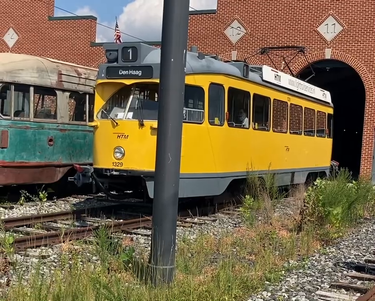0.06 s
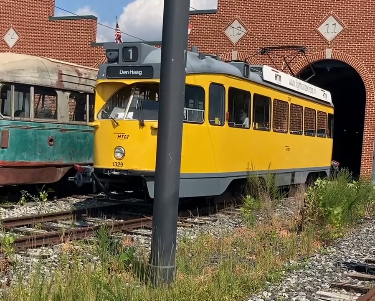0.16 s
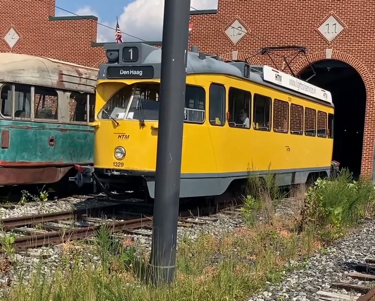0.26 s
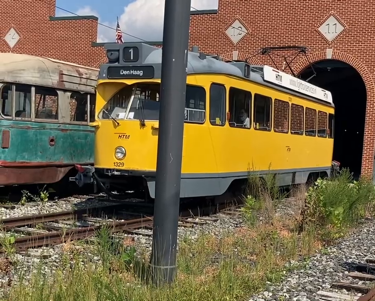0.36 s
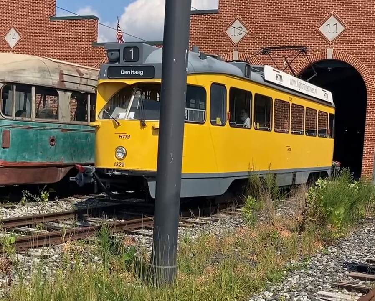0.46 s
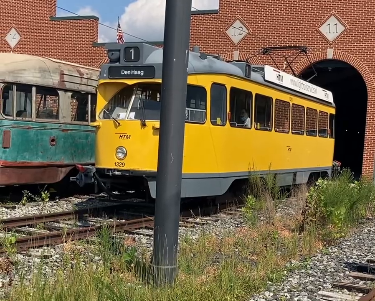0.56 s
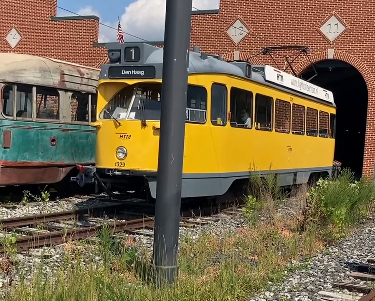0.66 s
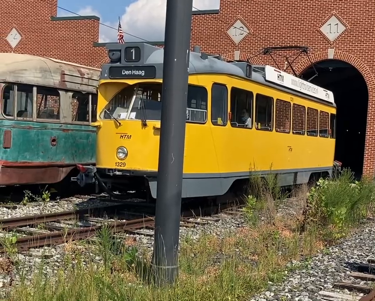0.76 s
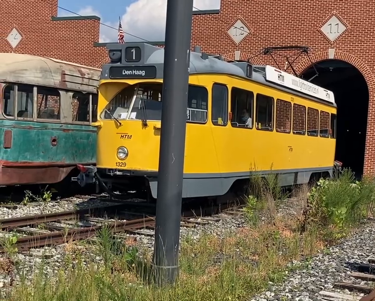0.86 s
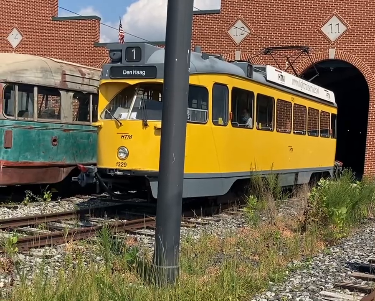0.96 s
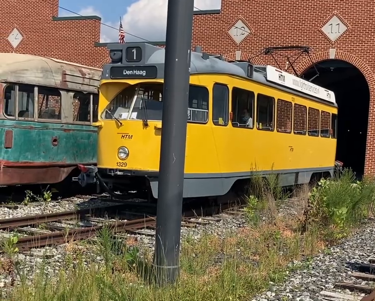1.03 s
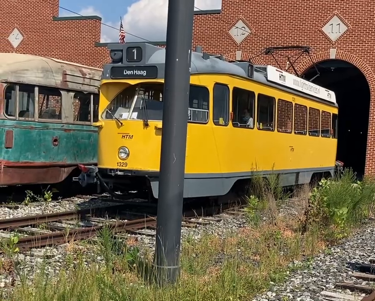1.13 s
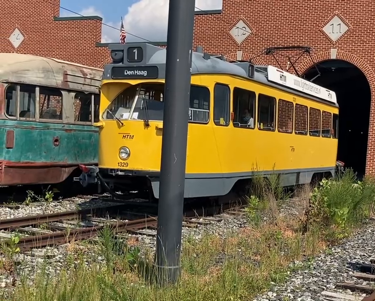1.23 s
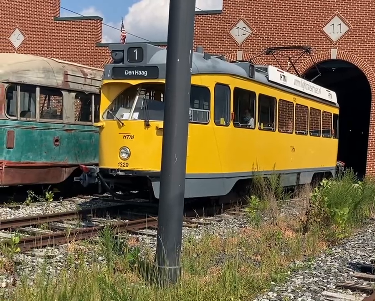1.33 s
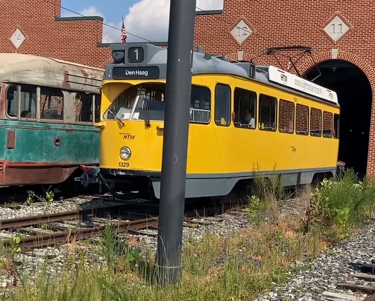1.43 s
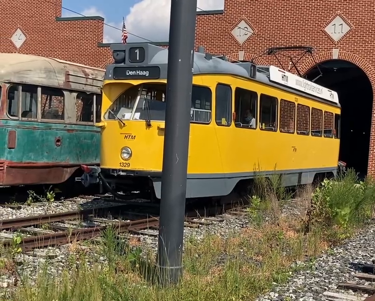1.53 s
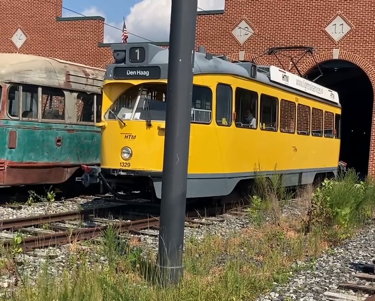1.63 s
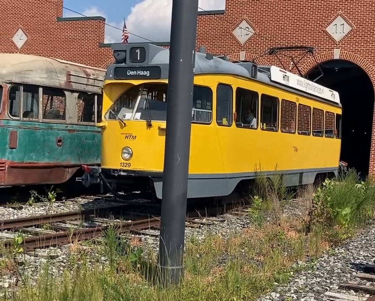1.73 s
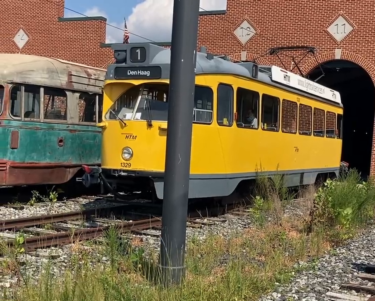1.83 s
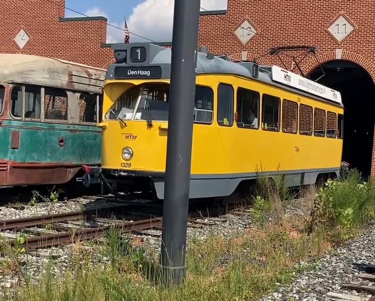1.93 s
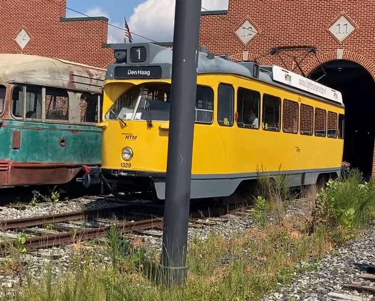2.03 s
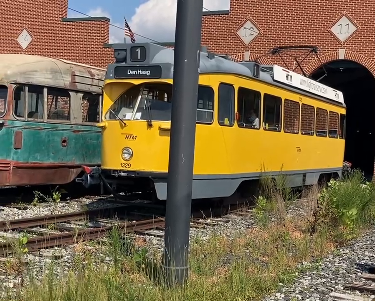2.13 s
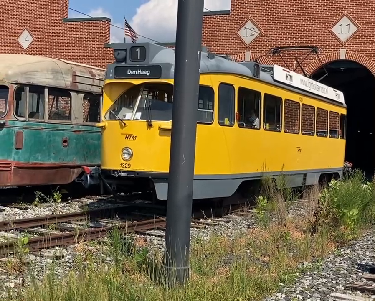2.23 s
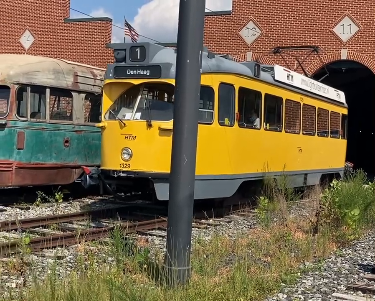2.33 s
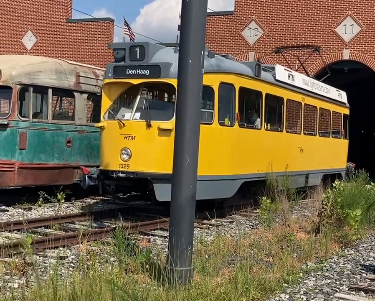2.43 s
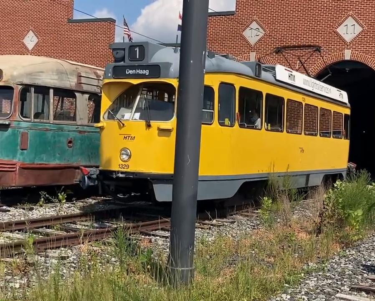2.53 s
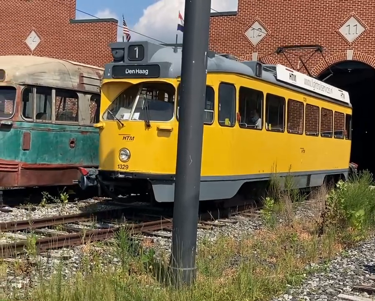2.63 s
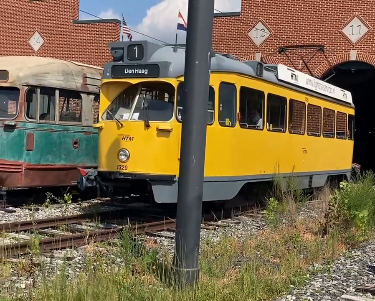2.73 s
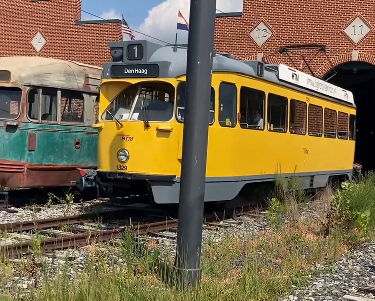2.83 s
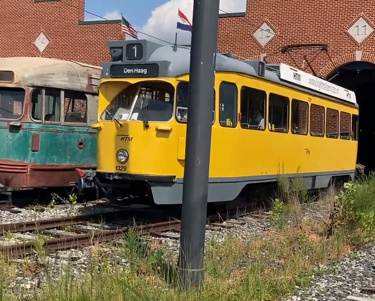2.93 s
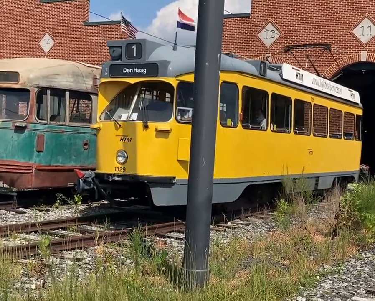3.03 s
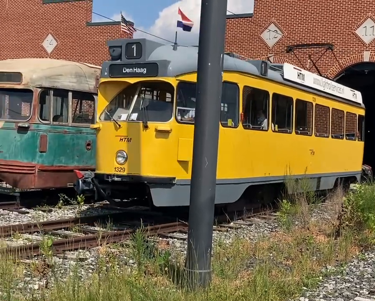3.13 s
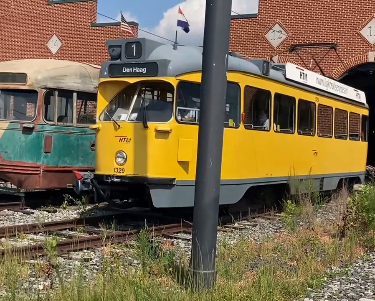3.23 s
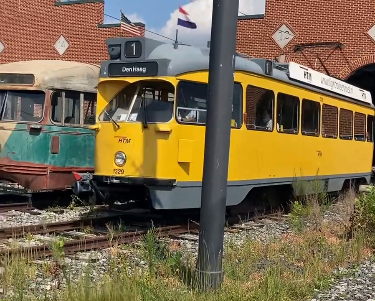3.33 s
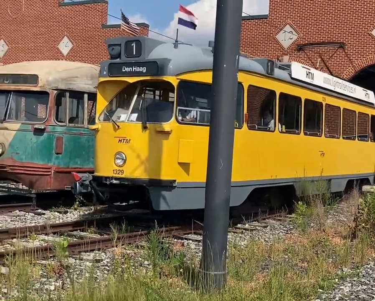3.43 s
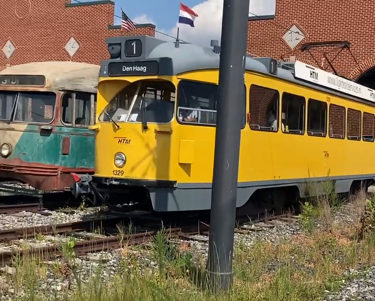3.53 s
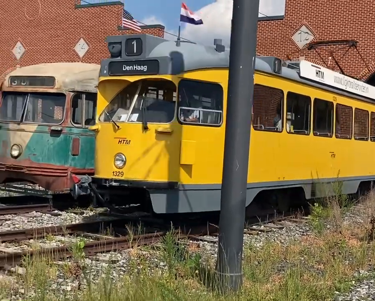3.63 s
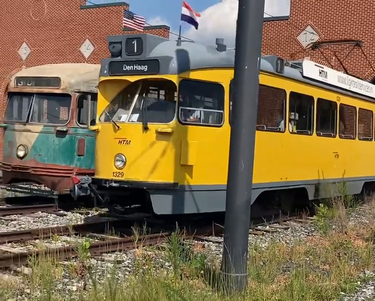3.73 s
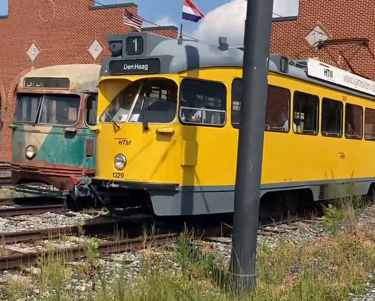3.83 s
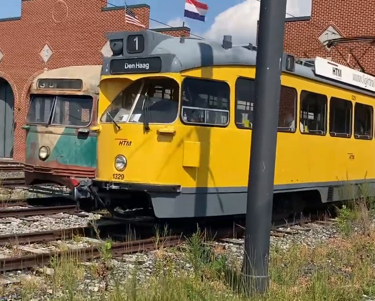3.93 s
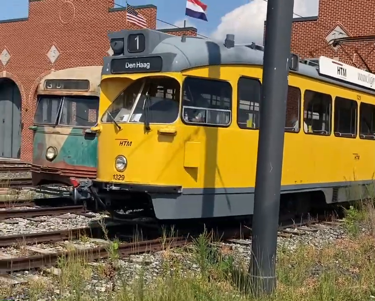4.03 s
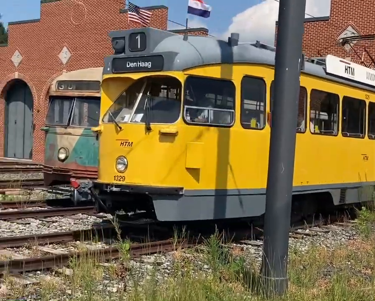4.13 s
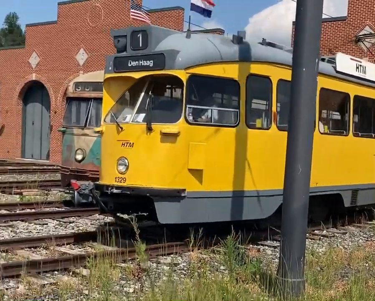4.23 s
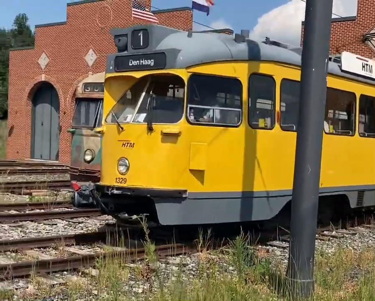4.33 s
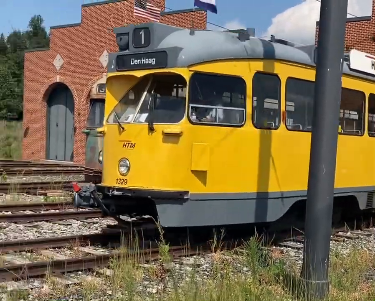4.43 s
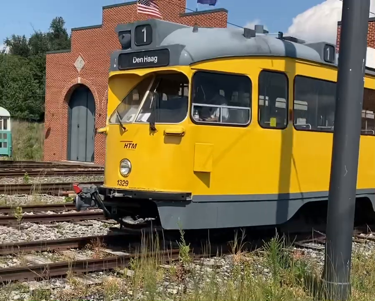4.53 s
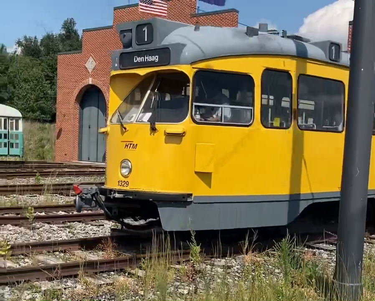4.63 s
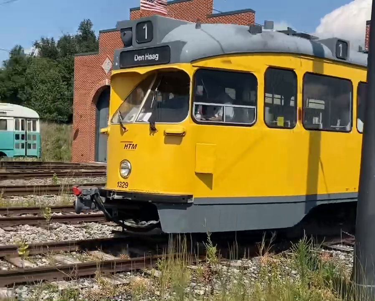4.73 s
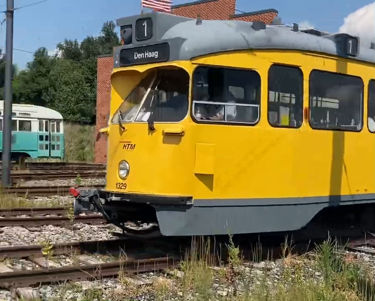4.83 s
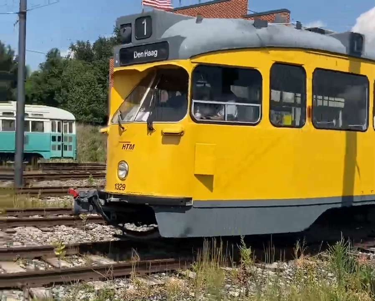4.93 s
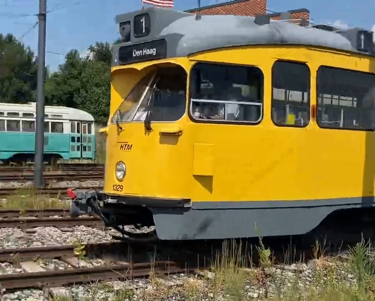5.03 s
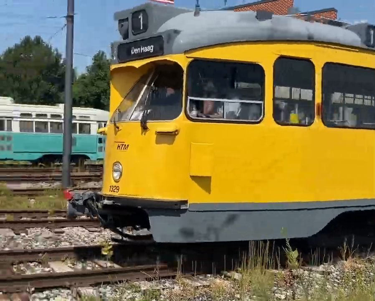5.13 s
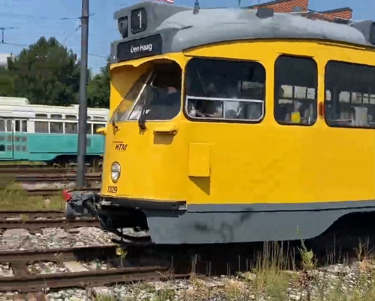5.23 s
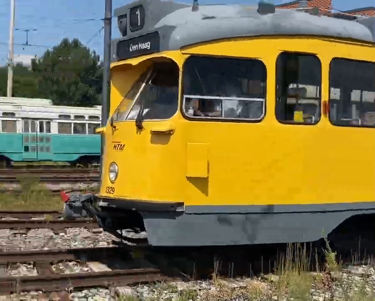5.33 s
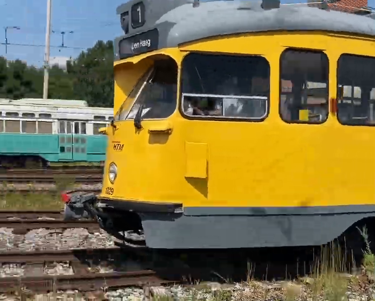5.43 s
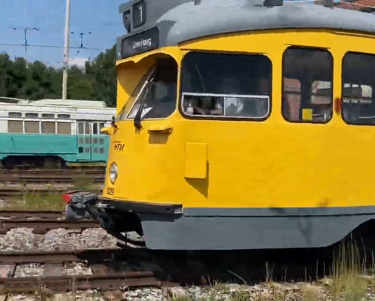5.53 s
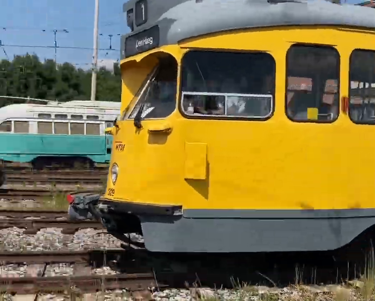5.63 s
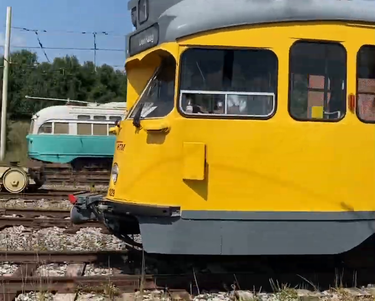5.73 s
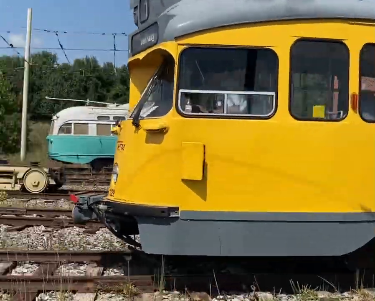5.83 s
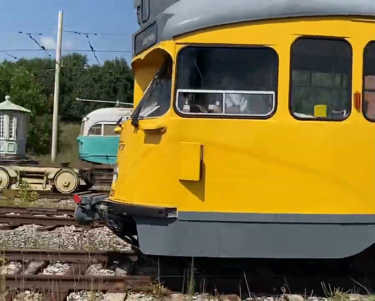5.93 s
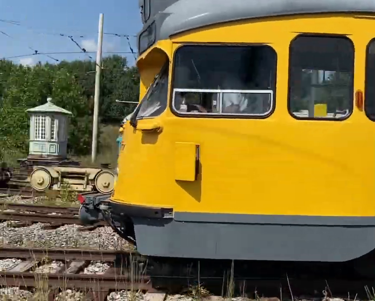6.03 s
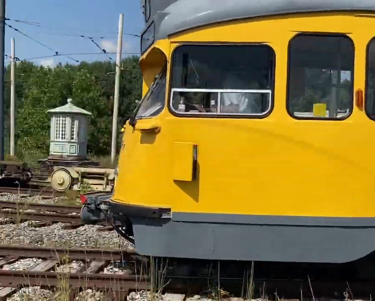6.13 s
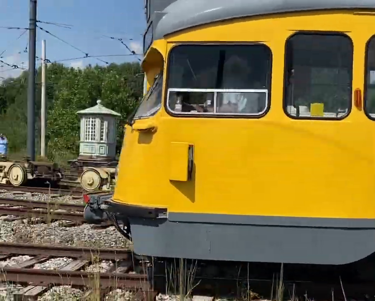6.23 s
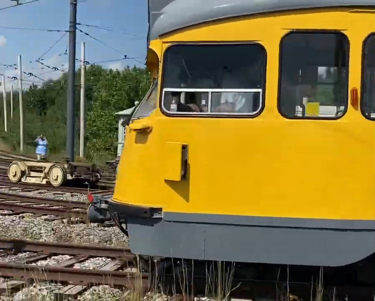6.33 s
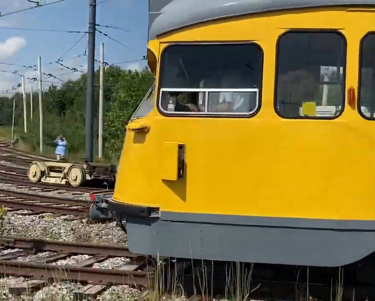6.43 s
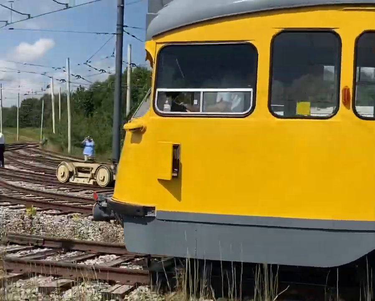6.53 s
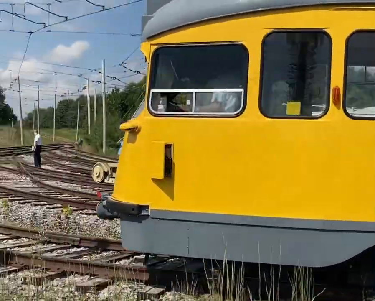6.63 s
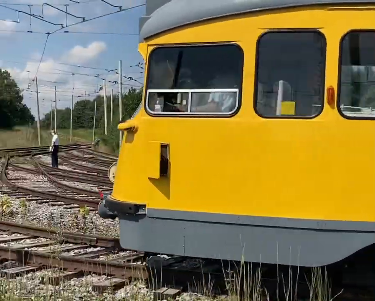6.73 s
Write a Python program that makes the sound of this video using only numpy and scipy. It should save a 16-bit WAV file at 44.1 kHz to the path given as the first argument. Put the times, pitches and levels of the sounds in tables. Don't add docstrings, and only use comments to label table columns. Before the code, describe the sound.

A streetcar passes close to a kerbside stereo microphone. First comes the decaying metallic ring of its gong, quiet rolling and small bird chirps over a distant yard hum. Then steel rolling grows heavy, with bunches of clanks, dull body thumps and sharp crackling spits. In the curve the flange rasps and a wheel moans unsteadily, breaking into short grabs. Low gusts thud, and a very thin brake squeak comes last.

```python
import sys
import numpy as np
from scipy import signal
from scipy.fft import rfft, irfft, next_fast_len
from scipy.io import wavfile
from scipy.ndimage import uniform_filter1d

SR = 44100
rng = np.random.default_rng(int(sys.argv[2]) if len(sys.argv) > 2 else 0)


def master(y):
    cut = np.clip(np.atleast_2d(y).T, -1, 1)
    pcm = np.round(cut * 32767)
    wavfile.write(sys.argv[1], SR, pcm.astype(np.int16))


def amplitude_ratio(level_db):
    exponent = np.asarray(level_db, float) / 20
    return 10 ** exponent


N = 298204


def rms_one(x):
    return x / np.sqrt(np.mean(x ** 2) + 1e-20)


def peak_at(x, db):
    return amplitude_ratio(db) * x / np.max(np.abs(x))


def in_time(rows, silent=None):
    s, *columns = np.transpose(rows)
    return [np.interp(np.arange(N) / SR, s, c, silent, silent) for c in columns]


def at_hz(points, hz, column=1):
    table = np.array(points, float)
    return np.interp(np.log(np.maximum(hz, 1)), np.log(table[:, 0]), table[:, column])


def add(out, at_s, sound):
    i = round(at_s * SR)
    out[i:i + len(sound)] += sound[:N - i]


def swells(rows):
    out = np.zeros(N)
    for s, height, length in rows:
        t = np.arange(-4 * length, 4 * length, 1 / SR)
        side_s = length * np.where(t < 0, 1, 1.06)
        add(out, s + t[0], height * np.exp(-(t / side_s) ** 2))
    return out


def drift(rate_hz):
    r = np.exp(-80 * np.pi * rate_hz / SR)
    slow = signal.lfilter([1], [1, -2 * r, r * r], rng.standard_normal(N // 40 + 2002))[2000:]
    return np.interp(np.arange(N) / 40, np.arange(len(slow)), rms_one(slow))


def resonate(x, hz, width_hz):
    r = np.exp(-np.pi * width_hz / SR)
    poles = [1, -2 * r * np.cos(2 * np.pi * hz / SR), r * r]
    return signal.lfilter([(1 - r * r) / 2, 0, (r * r - 1) / 2], poles, x + 1e-18)


def band(x, low_hz, high_hz):
    return signal.sosfilt(signal.butter(2, [low_hz, high_hz], "band", fs=SR, output="sos"), x)


def dull(x, cut_hz):
    return signal.sosfilt(signal.butter(4, cut_hz, fs=SR, output="sos"), x)


def patchy_bands(spectrum, modes, patchy_db, flicker_hz):
    size = next_fast_len(N)
    hz = np.fft.rfftfreq(size, 1 / SR)
    lift_db = sum(db / (1 + (2 * (hz - f) / width) ** 2) for f, width, db in modes)
    colour = rfft(rng.standard_normal(size)) * amplitude_ratio(at_hz(spectrum, hz) + lift_db) * (hz > 12)
    together = drift(4.3)
    octaves = np.log2(np.maximum(hz, 1))
    for centre in 22 * 2 ** np.arange(0, 9.6, .5):
        mask = np.clip(1 - 2 * np.abs(octaves - np.log2(centre)), 0, 1)
        flicker = amplitude_ratio(patchy_db * (0.5 * together + drift(flicker_hz)))
        yield centre, irfft(colour * mask, size)[:N] * flicker


# pitch_hz, level_db, t60_s, right_leads_left_rad, left_minus_right_db
GONG_MODES = [(707, -48.5, 6.5, -1.0, -7), (1232, -49.5, 3.4, .5, -6), (1832, -48, 1.8, 2.55, 0),
              (2489, -55.5, 2.2, -2.2, 0), (3206, -56.5, 1.15, -.7, 0), (4810, -66, 1.2, -.5, 3),
              (4265, -64, .15, 0, 0), (6616, -50, .2, 2.0, 0), (7654, -59.5, .35, .7, 0),
              (8396, -63, .3, 0, 0), (8942, -57, .2, 0, 0), (9448, -63, .2, 0, 0),
              (9857, -61, .22, -1.0, 2), (10942, -69, .2, 2.0, -2)]
GONG_BEATS = {707: (1.6, .55, .2), 1232: (2.35, .14, .75), 3206: (3.0, .29, .95), 4810: (13.5, .04, .5),
              2489: (6.0, .14, .4)}


def gong():
    t, out = np.arange(N // 3) / SR, np.zeros((2, N))
    for hz, db, t60, lead, pan_db in GONG_MODES:
        rate, quiet_s, depth = GONG_BEATS.get(hz, (0, 0, 0))
        throb = 1 - depth * np.exp(2j * np.pi * rate * (t - quiet_s))
        tone = amplitude_ratio(db - 60 * t / t60) * throb * np.exp(2j * np.pi * (hz * t + rng.random()))
        left = tone * amplitude_ratio(pan_db / 2)
        right = tone * np.exp(1j * lead) * amplitude_ratio(-pan_db / 2)
        out[:, :len(t)] += np.real([left, right])
    return amplitude_ratio(5.5) * out


ROLL_SPLITS_HZ = [150, 430, 2900, 13000]
# pitch_hz, level_db_per_hz
ROLL_COLOUR = [(30, -58.5), (60, -3), (110, -5.5), (190, -3), (280, -2.5), (400, -6), (600, -12),
               (900, -18), (1300, -16), (2200, -30), (3200, -33.5), (5000, -33.5), (8500, -34.5),
               (14000, -41.5)]
# pitch_hz, width_hz, lift_db
BODY_MODES = [(183, 41, 9), (271.4, 57, 5), (497, 18, 6.5), (870, 70, 9), (985, 28, 8.5)]
# time_s, level_db
NEARNESS = [(0, -43.5), (.8, -47), (1.4, -43.5), (2.2, -47.5), (2.7, -46.5), (3.5, -36.5), (3.85, -36.5),
            (4.05, -33.5), (4.4, -34), (4.7, -30), (5.1, -29), (5.6, -25), (5.85, -28), (6.1, -29),
            (6.3, -24.5), (6.5, -26), (6.76, -22)]
# full_near_level_db, share_of_nearness_swing, share_of_jolt
ROLL_PARTS = [
    (-29, 0.76, 1),
    (-25, 1.133, 0.46),
    (-35, 1.225, 0.68),
    (-53, 0.74, 0.77),
    (-63, 1.3, .6),
]
# peak_s, lift_db, length_s
JOLTS = [(.6, 9, 0.15), (1.14, 9, 0.059), (2.28, -3, 0.025), (2.54, 6, 0.03), (3.56, -6.5, 0.15),
         (3.73, 3, 0.018), (3.945, 5.5, 0.036), (4.93, 2.5, 0.02), (5.18, 1.5, 0.13), (5.61, 5.5, 0.014),
         (5.93, -1, 0.055), (6.06, 6, 0.031), (6.62, 1, 0.03), (4.45, 1, 0.072), (6.23, 3.5, .035),
         (6.74, 4.5, 0.087)]


def rolling():
    parts = np.zeros((len(ROLL_PARTS), N))
    for centre, sound in patchy_bands(ROLL_COLOUR, BODY_MODES, patchy_db=2.5, flicker_hz=16.0):
        parts[np.searchsorted(ROLL_SPLITS_HZ, centre)] += sound
    near_db = in_time(NEARNESS)[0] + 25
    jolt_db = swells(JOLTS)
    out = np.zeros(N)
    for part, (db, near, jolt) in zip(parts, ROLL_PARTS):
        out += amplitude_ratio(db + near * near_db + jolt * jolt_db) * rms_one(part)
    return out


# pitch_hz, level_db_per_hz
YARD_COLOUR = [(25, -46), (45, -3), (70, 3.5), (180, -7.5), (350, -13), (520, -24.5), (750, -15.5),
               (1200, -14.5), (2000, -26.5), (3000, -35.5), (5000, -40), (8000, -39.5), (11000, -56),
               (15000, -63)]


def yard():
    insects = [(8400, 980, 2.4)]  # pitch_hz, width_hz, lift_db
    bands = patchy_bands(YARD_COLOUR, insects, patchy_db=1.72, flicker_hz=9.5)
    return amplitude_ratio(-38) * rms_one(sum(sound for hz, sound in bands))


# peak_s, level_db, length_s
GUSTS = [(.32, -66, .05), (3.45, -62, 0.15), (4.25, -51, 0.17), (4.496, -39, 0.093), (4.85, -50, 0.16),
         (5.49, -39, .07), (5.68, -31.5, 0.064), (5.894, -38, 0.053), (6.29, -29.5, 0.077), (5.1, -47, .06),
         (6.457, -41, 0.049), (1.7, -66, 0.092), (2.28, -58, 0.036)]


def wind():
    lumps = []
    for port in range(2):
        buffet = dull(band(rng.standard_normal(N), 38, 130), 520)
        lumps.append(amplitude_ratio(2.0 * drift(9.8)) * rms_one(buffet))
    calm_db = -75.5
    gusts = swells([(s, amplitude_ratio(db), length) for s, db, length in GUSTS])
    return (amplitude_ratio(calm_db) + gusts) * np.array(lumps)


# start_s, end_s, start_pitch_hz, end_pitch_hz, level_db
BIRDS = [(0.217, 0.36, 4150, 3540, -66.5), (0.39, 0.46, 9150, 9050, -71), (.4, .52, 8600, 7700, -69),
         (1.033, 1.102, 9200, 9300, -68), (1.443, 1.603, 9200, 6250, -67), (1.66, 1.71, 8300, 8200, -74),
         (1.85, 1.97, 9350, 9130, -77), (2.007, 2.14, 8200, 8140, -71), (2.6, 2.72, 7400, 7900, -72),
         (2.66, 2.8, 8300, 8050, -73), (2.79, 2.918, 8350, 7900, -70), (2.79, 2.84, 5900, 5750, -65),
         (2.617, 2.656, 6270, 5500, -64), (2.96, 3.03, 5840, 5400, -80), (3.1, 3.16, 9400, 9300, -75),
         (3.11, 3.17, 7350, 7500, -72), (3.34, 3.39, 5770, 5500, -68), (3.42, 3.6, 7740, 8000, -69),
         (.55, .66, 8300, 7600, -74), (.72, .8, 7500, 7900, -77), (1.28, 1.34, 7400, 7000, -67),
         (2.7, 2.78, 7600, 8500, -73), (3.206, 3.3, 8000, 7500, -78)]


def birds():
    out = np.zeros(N)
    for start, end, from_hz, to_hz, db in BIRDS:
        size = round((end - start) * SR)
        t = np.arange(size) / SR
        flutter = .01 * np.sin(2 * np.pi * (rng.uniform(40, 90) * t + rng.random()))
        pitch = np.linspace(from_hz, to_hz, size) * (1 + flutter)
        note = np.hanning(size) ** .5 * np.sin(2 * np.pi * np.cumsum(pitch) / SR)
        add(out, start, amplitude_ratio(db + 4) * note)
    t = np.arange(SR // 4) / SR
    smear_t60_s, smear_db = .18, 2
    smear = rng.standard_normal(len(t)) * amplitude_ratio(-60 * t / smear_t60_s)
    smeared = signal.fftconvolve(out, smear / np.linalg.norm(smear))[:N]
    return amplitude_ratio(3.5 * drift(40)) * out + amplitude_ratio(smear_db) * smeared


def burst(length_s, grit_db):
    t = np.arange(round(.15 * SR)) / SR
    grit = rng.standard_normal(len(t)) * amplitude_ratio(grit_db * rng.standard_normal(len(t)))
    grit[:2] = 6
    crack = 2.6 * np.exp(-t / .0015)
    tail = 0.77 * np.exp(-t / (3 * length_s))
    return grit * (crack + np.exp(-(t / length_s) ** 2) + tail)


# start_s, peak_db, ring_hz, length_s, brightness_db
CLANKS = [(2.287, -38, 1190, 0.006, -19), (3.546, -46, 821, .008, -15), (4.126, -38, 964, .006, -15),
          (4.749, -40, 890, 0.0036, -17), (4.75, -24.5, 920, 0.014, -18), (4.771, -36.5, 860, 0.012, -28),
          (4.889, -36.5, 810, 0.013, -25), (5.093, -29.5, 821, 0.0055, -22), (5.702, -32, 975, 0.0072, -40),
          (6.077, -27, 990, .005, -13.5), (6.14, -30, 990, .006, -8.5), (6.09, -26, 970, 0.005, -34),
          (6.268, -42, 870, 0.0069, 3), (6.393, -46, 896, 0.0078, -28), (6.436, -43, 919, 0.0044, -37),
          (6.568, -53, 760, 0.00592, -21), (6.61, -44, 970, 0.0084, -28), (6.72, -43, 1260, 0.005, -15)]
# start_s, peak_db, ring_hz, length_s, brightness_db
RATTLES = [
    (3.702, -33.5, 905, 0.019, -20),
    (3.717, -31.5, 985, 0.013, -24),
    (3.905, -25.5, 1450, 0.018, 6),
    (3.918, -26, 786, 0.018, 20),
    (3.938, -31, 1120, 0.013, -19),
    (5.134, -22.5, 1030, 0.023, -9),
    (5.401, -20.5, 920, 0.024, -5),
    (6.727, -17, 1200, 0.009, -7),
]
# pitch_hz, width_hz, share
CLANK_RINGS = [(1550, 200, 1.0), (2340, 220, 2.1), (2660, 120, 1.2), (3420, 130, 0.76)]
# start_s, peak_db, pitch_hz
THUMPS = [(2.46, -27.5, 290), (2.531, -23, 298), (3.729, -26, 174), (3.92, -18, 305), (3.937, -19.5, 295),
          (4.068, -27, 239), (4.14, -22, 244), (4.465, -19.5, 210), (4.551, -18.5, 220), (4.745, -17, 284),
          (4.861, -18, 264), (4.893, -14.5, 247), (5.139, -14, 270), (5.43, -18, 204), (5.533, -16, 273),
          (5.592, -9.5, 284), (6.22, -9.5, 250), (6.255, -9.5, 273), (6.31, -10.5, 282.3),
          (6.345, -10.5, 260), (6.55, -11.5, 237), (6.68, -5, 167)]
# start_s, peak_db, length_s
TICKS = [(1.319, -56, .003), (1.7206, -48, .004), (1.94, -57, .003), (2.074, -41, 0.0012),
         (2.193, -51, .003), (2.217, -46, 0.002), (2.421, -56, .003), (2.512, -56, .004),
         (3.007, -51, .003), (3.0187, -45, .004), (3.2507, -51, .003), (3.367, -51, .003),
         (3.543, -49, .005), (3.7, -50, .004), (3.77, -49, .004), (3.9206, -44, .006), (3.9446, -50, .005),
         (4.212, -46, .004), (4.667, -23.5, 0.0012), (4.857, -45, .003), (5.086, -49, .003),
         (5.1494, -32, .008), (5.251, -46, .003), (6.0014, -41, .004), (6.127, -42, .004)]
# start_s, peak_db, length_s
SPITS = [
    (1.073, -30, 0.029),
    (1.087, -28, 0.015),
    (3.984, -37, 0.014),
    (5.3085, -30, 0.014),
    (5.405, -18.5, 0.012),
    (5.453, -23, 0.0088),
    (6.151, -23, 0.016),
    (6.454, -33, 0.014),
    (6.698, -30, 0.01),
    (6.728, -26, 0.026),
]


def knocks():
    out = np.zeros(N)
    for s, db, hz, length, bright_db in CLANKS + RATTLES:
        rattle = burst(length, grit_db=0.5)
        body = dull(8.5 * resonate(rattle, hz, 120) + band(rattle, 410, 2200), 3800)
        rings = sum(share * resonate(rattle, ring_hz, width) for ring_hz, width, share in CLANK_RINGS)
        ping = dull(.5 * band(rattle, 1400, 3400) + rings, 4600)
        add(out, s + .0003, peak_at(body + amplitude_ratio(bright_db) * ping, db + 3.5))
    for s, db, hz in THUMPS:
        push = burst(0.011, grit_db=8.0)
        add(out, s, peak_at(resonate(resonate(push, hz, 48), hz, 410), db - 3.5))
    for s, db, length in TICKS + SPITS:
        add(out, s, peak_at(band(burst(length, grit_db=3), 3000, 16000), db))
    return out


# pitch_hz, width_hz, level_db
WHEEL_MODES = [(899, 57, 9), (996, 53, 18.5), (1060, 43, 8.5), (1260, 32, 7.5), (1412, 76, 15.5),
               (1588, 15, 10), (2010, 59, 8.5), (2490, 51, 9), (2990, 87, 5.5), (3520, 23, -3),
               (3560, 42, 2.5), (4400, 900, -1)]
# peak_s, level_db, length_s
RUBS = [
    (5.519, -27.5, 0.017),
    (5.802, -31, 0.019),
    (5.861, -27.5, 0.046),
    (5.935, -30.5, 0.038),
    (6.014, -32, 0.041),
    (6.092, -28, 0.026),
    (6.16, -26.5, 0.038),
]


def flange():
    start = round(5.4 * SR)
    rub = (rng.standard_normal(N) * amplitude_ratio(2.0 * drift(47)))[start:]
    rings = np.zeros(len(rub))
    for hz, width, db in WHEEL_MODES:
        ring = resonate(resonate(rub, hz, width), hz, 4.2 * width)
        rings += amplitude_ratio(db + 2.0 * drift(10)[start:]) * rms_one(ring)
    rasp = amplitude_ratio(-5) * rms_one(dull(band(rub, 800, 2700), 5600))
    level = swells([(s, amplitude_ratio(db), length) for s, db, length in RUBS])
    return amplitude_ratio(0.5) * level * np.pad(rms_one(rings + rasp), (start, 0))


# time_s, stick_slip_hz, level_db, slip_sharpness_db
GROAN = [
    (5.785, 492.6, -37, -5),
    (5.8, 493.6, -33, 9.5),
    (5.83, 497.4, -32, 8),
    (5.878, 485.6, -21, 3.5),
    (5.9, 491, -15, 3.5),
    (5.934, 486.5, -14.5, -1),
    (5.955, 483.6, -19.5, 1),
    (6.0, 491.8, -22, 12),
    (6.04, 496.7, -18.5, 4),
]
# time_s, stick_slip_hz, level_db, slip_sharpness_db
REGRIP = [
    (6.062, 491, -24.5, 8),
    (6.082, 491.8, -38.5, 20),
    (6.101, 491.3, -34, 16),
    (6.123, 494.8, -25, -1),
    (6.142, 494, -32, 9),
    (6.162, 497, -30, 15.5),
    (6.192, 497.7, -26, 14.5),
    (6.214, 493.7, -39, 13),
    (6.25, 499.8, -30, -10),
]
# peak_s, length_s, stick_slip_hz, level_db, slip_sharpness_db
GRABS = [
    (5.522, 0.024, 491, -30.5, 11.5),
    (6.346, 0.072, 482, -32.5, -18),
    (6.448, 0.021, 489, -25, -0.5),
    (6.531, 0.042, 488, -35, -18),
    (6.601, 0.02, 493, -36.5, 8.5),
]
# multiple, level_db, share_of_sharpness
OVERTONES = [(1, 2, 0), (2, -13, 1.37), (3, -24.5, 0.6), (4, -25.5, 0.63), (5, -36.5, 1.2), (6, -49, 0.95),
             (7, -56, 1.1)]


def unsteady_lock(level):
    return 5.0 * drift(20) * np.clip(1 - level / .05, 0, 1)


def groan():
    grabs = [(s, hz, db, sharp) for s, length, hz, db, sharp in GRABS]
    rate, _, sharp_db = in_time(sorted(GROAN + REGRIP + grabs))
    turns = np.cumsum(rate * (1 + .0055 * drift(35))) / SR
    level = uniform_filter1d(amplitude_ratio(in_time(GROAN + REGRIP, silent=-120)[1]), size=300)
    level = level + swells([(s, amplitude_ratio(db), length) for s, length, hz, db, sharp in GRABS])
    level = level * amplitude_ratio(unsteady_lock(level))
    tone = np.zeros(N)
    for k, db, share in OVERTONES:
        waver_db = 2.5 * (k - .7) ** 0.18 * drift(30)
        phase = round(k) * 2 * np.pi * turns + (k - 1) * 1.17 * drift(7.1)
        tone += amplitude_ratio(4 + db + share * sharp_db + waver_db) * np.sin(phase)
    return level * tone


# time_s, level_db
WHISTLE = [
    (6.55, -69),
    (6.646, -64),
    (6.736, -57),
    (6.748, -38),
    (6.76, -51),
]


def whistle():
    pitch_hz = 15420
    tone = resonate(resonate(rng.standard_normal(N), pitch_hz, 60), pitch_hz, 90)
    return amplitude_ratio(in_time(WHISTLE, silent=-120)[0]) * rms_one(tone)


# pitch_hz, lead_rad
CAR_LEAD = [(100, .05), (250, .17), (400, .5), (490, 1.3), (700, 3.6), (820, 5.6), (990, 6.7), (1250, 6.9),
            (1480, 8.2), (1580, 11.8), (2000, 11.2), (2300, 12.57)]
# pitch_hz, lead_rad
YARD_LEAD = [(100, .04), (250, .15), (520, .6), (700, -.8), (1000, .5), (1500, .5), (1800, 0), (2300, 0)]
# pitch_hz, lead_rad
TOP_LEAD = [(2300, 0), (2800, 3.1), (3750, 5.2), (5450, 3.15), (7500, .8), (7800, 0), (9200, -.1),
            (11400, -3.0), (12500, -3.25), (13700, -5.8), (14200, -6.28)]
# pitch_hz, car_likeness_0_to_1, car_left_minus_right_db, yard_likeness_0_to_1
PORTS = [(60, .86, 0, .99), (130, .97, 0, .99), (200, .995, 0, .99), (380, .98, 2.5, .95),
         (500, .93, .5, .56), (750, .55, -6.5, .35), (1000, .83, -4.5, .6), (1300, .77, -1, .66),
         (1600, .48, -2.5, .52), (2000, .6, -3.5, .47), (2450, .5, -3, .5), (2900, .96, 0, .76),
         (3900, .67, -.5, .6), (5500, .94, 0, .72), (7000, .8, 0, .85), (9000, .92, 0, .92),
         (14000, .86, 0, .86)]


def ports(steady, events, lead, tilt, likeness_column):
    size = next_fast_len(N + SR // 2)
    hz = np.fft.rfftfreq(size, 1 / SR)
    t = np.arange(SR // 3) / SR
    scatter_t60_s, scatter_lag_s = .035, .07
    scatter = rng.standard_normal(len(t)) * amplitude_ratio(-60 * t / scatter_t60_s)
    echo = rfft(scatter / np.linalg.norm(scatter), size)
    alike = at_hz(PORTS, hz, likeness_column)
    lead_rad = at_hz(lead, hz) - lead[-1][1] + at_hz(TOP_LEAD, hz)
    half = np.exp(.5j * lead_rad) * amplitude_ratio(-tilt * at_hz(PORTS, hz, 2) / 2)
    late = np.pad(steady, (round(scatter_lag_s * SR), 0), "reflect")[:N]
    near = np.sqrt((1 + alike) / 2) * rfft(steady + events, size)
    far = np.sqrt((1 - alike) / 2) * (rfft(late, size) + echo * rfft(events, size))
    return irfft(np.array([(near + far) / half, (near - far) * half]), size)[:, :N]


def scene():
    car_events = knocks() + flange() + groan() + whistle()
    car = ports(rolling(), car_events, CAR_LEAD, tilt=1, likeness_column=1)
    background = ports(yard(), birds(), YARD_LEAD, tilt=0.08, likeness_column=3)
    return gong() + car + background + wind()


def roll_off(x):
    return signal.sosfilt(signal.butter(12, 16510, fs=SR, output="sos"), x)


def record(dry):
    cut = signal.sosfilt(signal.cheby2(12, 60, 16150, fs=SR, output="sos"), dry)
    return roll_off(cut)


dry = scene()
out = record(dry)
master(out)
```